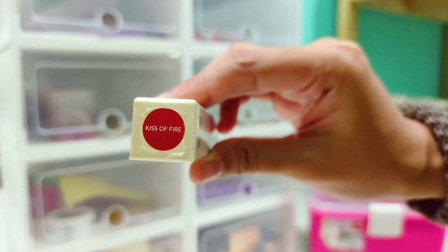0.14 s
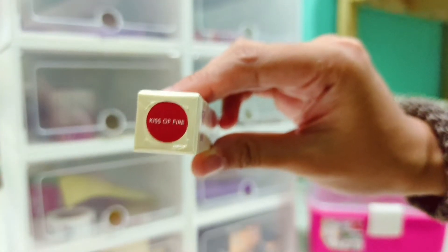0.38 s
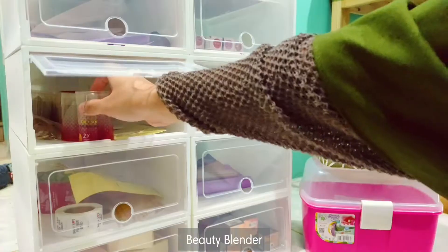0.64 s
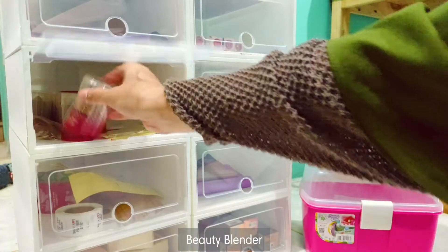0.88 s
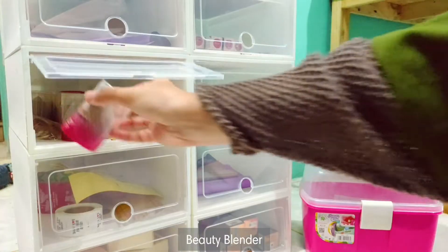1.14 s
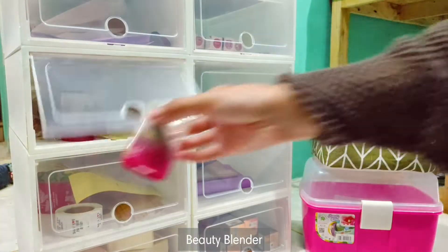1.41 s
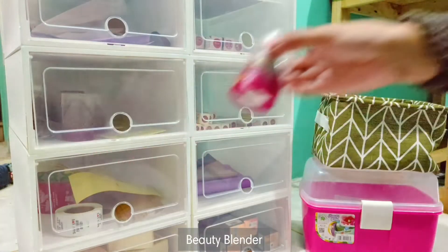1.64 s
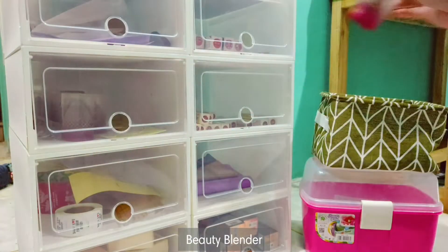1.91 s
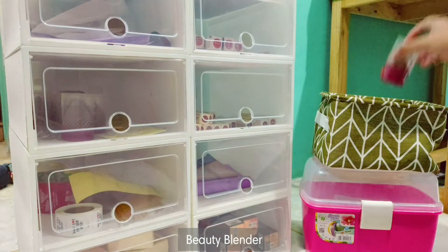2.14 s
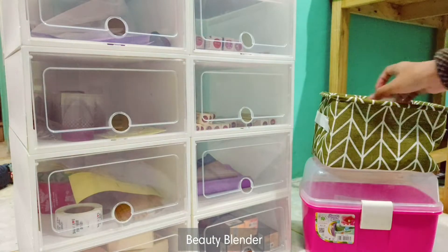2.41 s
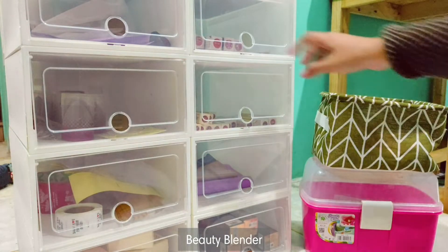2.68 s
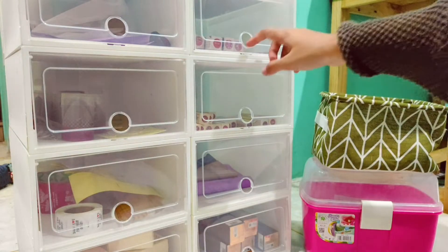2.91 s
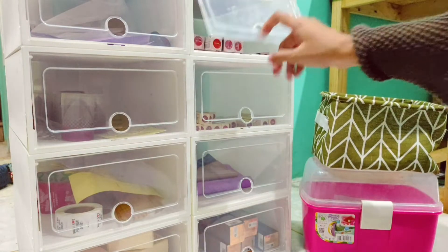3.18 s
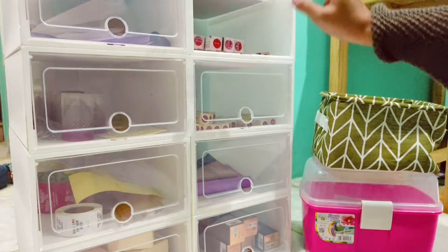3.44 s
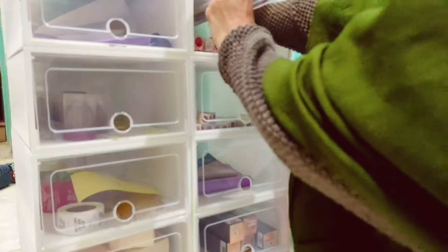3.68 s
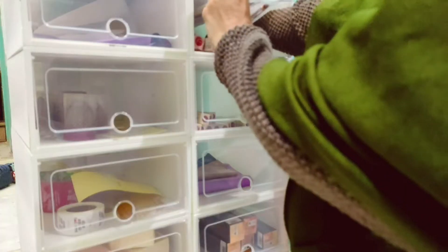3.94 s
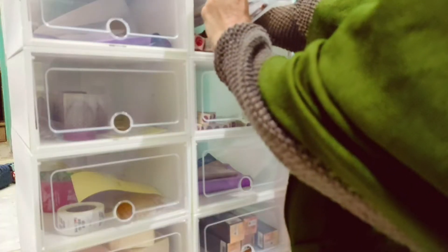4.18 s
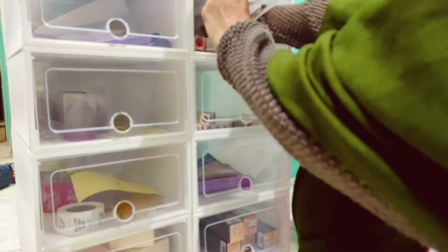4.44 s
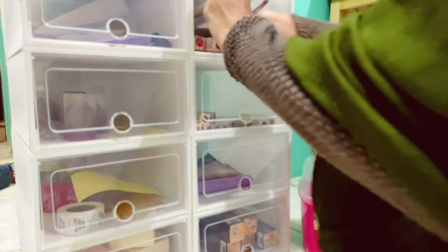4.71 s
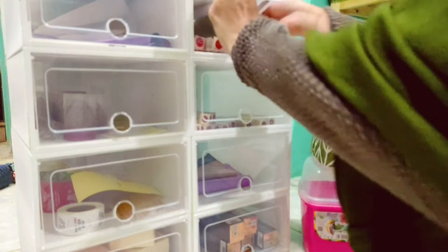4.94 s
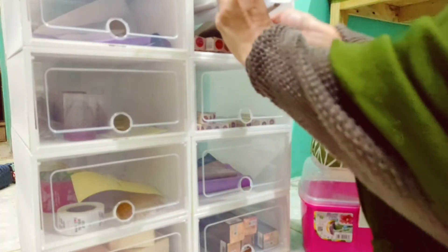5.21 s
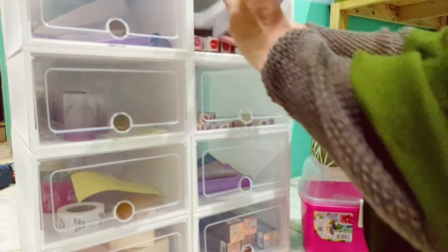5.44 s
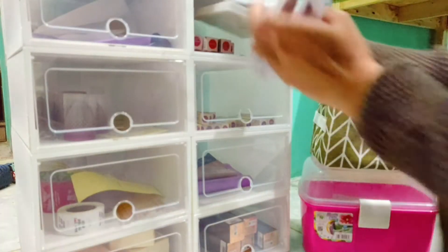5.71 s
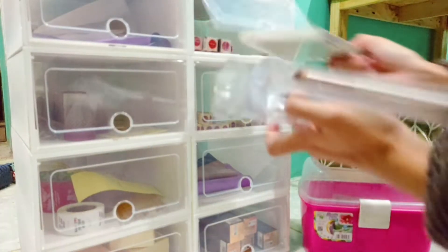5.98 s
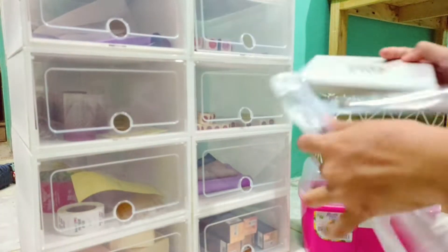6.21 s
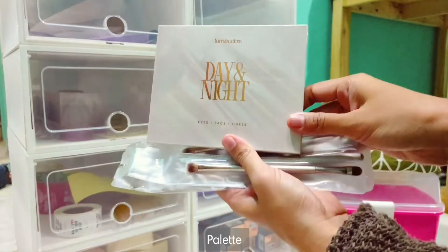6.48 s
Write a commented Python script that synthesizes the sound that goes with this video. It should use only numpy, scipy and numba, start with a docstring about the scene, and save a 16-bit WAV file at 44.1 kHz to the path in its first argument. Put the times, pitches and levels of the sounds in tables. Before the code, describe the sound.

Close stereo pickup of stacked plastic storage boxes indoors, over soft fan-like noise. Quiet ticks come first, then one hard flap clack with a short rattle. A second clack leads to a tight cluster of loud hollow knocks. Packs in crisp film are then dragged out with crackle, rubbing and small bumps, growing busier and finishing with sharp plastic snaps and wrapper rustle.

```python
"""A stack of thin plastic storage boxes in a small hard room, heard at two close microphone ports.
A humming, fan-like floor of coloured noise runs throughout; faint cracks (noise bursts) come first.
From 1.6 s flap doors clack and things are set down and knocked: blows ring the box modes, loose things rattle.
From 3.3 s film-wrapped packs are pulled out: cracks, crinkle and scrape of grainy noise, and the
drumming of the hollow boxes, with further knocks and low thuds to the end."""
import sys
import numpy as np
from scipy import signal
from scipy.fft import rfft, irfft
from scipy.io import wavfile
from scipy.ndimage import uniform_filter1d
from numba import njit

SR = 44100
rng = np.random.default_rng(int(sys.argv[2]) if len(sys.argv) > 2 else 0)


def inscribe(sig):
    """Save sig as 16-bit PCM at rate SR to the path in sys.argv[1].

    A 1-D sig is mono; a 2-D sig holds one channel per row.
    Samples are clipped to [-1, 1] before scaling.
    """
    pcm = np.round(np.clip(np.atleast_2d(sig).T, -1, 1) * 32767)
    wavfile.write(sys.argv[1], SR, pcm.astype(np.int16))


def invert_db(level):
    """Linear amplitude ratio for a level in decibels (20 dB per decade), elementwise."""
    return 10 ** (np.asarray(level, dtype=float) / 20)


N = 291015


def level(x, rms_db):
    """Scale to an rms level."""
    return x * invert_db(rms_db) / np.sqrt(np.mean(x ** 2))


def colour(x, points):
    """Minimum-phase filter through (freq_hz, gain_db) points, built from the folded cepstrum."""
    freq_hz, gain_db = np.transpose(points)
    size = 8192
    bins_hz = np.arange(size // 2 + 1) * SR / size
    log_gain = np.interp(np.log(bins_hz + 1), np.log(freq_hz), gain_db) * np.log(10) / 20
    cepstrum = irfft(log_gain)
    cepstrum[1:size // 2] *= 2
    cepstrum[size // 2 + 1:] = 0
    impulse = irfft(np.exp(rfft(cepstrum)))
    return signal.fftconvolve(x, impulse[None], axes=1)[:, :N]


def ring(x, freq_hz, width_hz):
    """One resonance, gain 1 at its centre."""
    return signal.lfilter(*signal.iirpeak(freq_hz, freq_hz / width_hz, fs=SR), x)


def high_pass(x, order, cutoff_hz):
    """Butterworth high-pass."""
    return signal.sosfilt(signal.butter(order, cutoff_hz, "high", fs=SR, output="sos"), x)


ALIKE_HZ, UNLIKE_BASS = 600, 0.28  # crossover; each port's own share of the bass


def pair():
    """Noise at the two microphone ports: the bass nearly alike, the treble unrelated."""
    shared, left, right = rng.standard_normal((3, N))
    own = np.array([left, right])
    low_pass = signal.butter(1, ALIKE_HZ, fs=SR, output="sos")
    bass = signal.sosfilt(low_pass, shared + UNLIKE_BASS * own)
    return bass + high_pass(own, 1, ALIKE_HZ)


# blows on the boxes: start_s, peak_db (before the high-pass), spot_hz (pitch struck hardest),
# other_db (gain added to every mode), ring_factor (times the mode t60)
BLOWS = [(1.569, -19, 250, -24, 1.2), (2.487, -21, 302, -16, 1.25), (2.507, -34, 205, -23, 0.77),
         (2.547, -39.5, 242, 4, 0.51), (2.67, -39.5, 255, -6, 0.66), (2.709, -38.5, 344, -11, 0.9),
         (2.772, -28.5, 351, -8.5, 0.7), (2.794, -35, 158, -10, 1.1), (2.913, -17.5, 360, -21, 0.89),
         (2.925, -17.5, 219, -28, 0.66), (2.94, -18.5, 558, -26.5, 0.2), (2.961, -26.5, 190, -36, 0.6),
         (3.018, -34, 199, -14, 0.34), (3.078, -36, 342, -6, 1.1), (3.326, -42, 375, 4, 1.4),
         (3.8, -41, 257, 9, 1.5), (4.065, -44, 175, 3, 1.1), (4.145, -45.5, 250, -11, 2.5),
         (4.361, -39, 278, -18, 1), (4.458, -37, 512, -17, 1.5), (4.568, -36, 224, -4, 0.87),
         (4.594, -42, 206, -12, 4.2), (4.908, -40.5, 290, 2, 0.72), (4.939, -43, 250, -22, 2.1),
         (4.981, -32, 196, -1, 0.94), (5.067, -43, 205, -21, 0.44), (5.244, -48, 425, -13, 0.59),
         (5.424, -37.5, 288, -9, 1.2), (5.511, -41.5, 191, -17, .75), (5.668, -34.5, 230, -4.5, 1.2),
         (5.857, -36.5, 188, -15, 1.3), (5.896, -33, 273, -15, 1.3), (5.98, -32.5, 498, -19, 1.5),
         (6.031, -32.5, 256, -16, 1.2), (6.086, -35, 253, -22, 1.7), (6.206, -22.5, 258, -18.5, 1.2),
         (6.324, -46, 250, -13, .8), (6.39, -43.5, 243, -7, 0.87), (6.435, -45.5, 446, -17, 1.3)]
# modes of hollow boxes and flaps: freq_hz, level_db (relative), t60_s; knocks use only freq_hz, level_db and t60_s
BOX_MODES = [(162.3, 1.5, 0.25), (205, 4, 0.12), (237.3, 3.5, 0.092), (250, -8, 0.22), (289.6, 8.5, 0.032),
             (334, 2, 0.056), (374.7, 2.5, 0.043), (425, 3, 0.081), (491, -9.5, 0.17), (604, 2, 0.064),
             (696.4, 3, 0.058), (839, -7, 0.063), (1050, 2.5, 0.036), (1170, -16, 0.17),
             (1307, -13.5, 0.16)]
FALL_DB = 12.5  # fall a quarter octave from the struck pitch
CONTACT_S, SOFTER = 0.003, 0.26  # push time at other_db = 0; lower other_db, softer and longer push
RADIATES_HZ = 146  # thin panels send out little bass below this


def knocks():
    """Each blow rings the box modes, most those near the pitch of the spot it lands on."""
    out, t = np.zeros(N + SR), np.arange(SR // 2) / SR
    freq_hz, level_db, t60_s = np.array(BOX_MODES).T[:, :, None]
    for start_s, peak_db, spot_hz, other_db, ring_factor in BLOWS:
        quarter_octaves = np.log2((freq_hz / spot_hz) ** 4)
        size = invert_db(level_db) * (invert_db(-FALL_DB * quarter_octaves ** 2) + invert_db(other_db))
        push = 1 - np.exp(-(t / (CONTACT_S * invert_db(-SOFTER * other_db))) ** 2)
        decay = 1000. ** (-t / (t60_s * ring_factor))
        blow = push * np.sum(size * np.sin(2 * np.pi * freq_hz * t) * decay, axis=0)
        i = int(start_s * SR)
        out[i:i + len(t)] += invert_db(peak_db) * blow / np.abs(blow).max()
    return high_pass(out[:N], 2, RADIATES_HZ)


# sharp cracks of hard plastic and film: start_s, burst_db (envelope scale), body_db (relative to film part),
# ring_hz (body), t60_s (burst)
CRACKS = [(.6714, -61.5, -12, 1220, 0.052), (.742, -44.5, -19, 1170, 0.037), (0.8725, -57, -14, 1180, 0.14),
          (1.129, -53.5, 2.5, 2500, 0.044), (1.204, -61, -8, 980, 0.09), (1.396, -57.5, -5, 1230, 0.15),
          (1.5608, -44, 4, 1100, 0.1), (1.57, -26.5, -7.5, 1080, 0.068), (1.807, -57.5, 2, 1180, 0.054),
          (2.4838, -43, 8.5, 1105, 0.13), (2.545, -57, 14, 1310, .04), (2.672, -60, 10.5, 1145, .06),
          (2.711, -59.5, 10.5, 1250, 0.042), (2.6392, -48.5, 2.5, 1260, 0.064),
          (2.7704, -47, 5, 1250, .054), (2.9092, -41, 0.5, 1000, 0.16), (2.9317, -32, -2.7, 954, 0.088),
          (3.3243, -45, -1, 1520, .056), (3.356, -54, -3, 966, 0.056), (3.685, -53.5, 2.5, 920, 0.041),
          (3.9554, -36.5, -4, 915, 0.019), (4.002, -48.5, -14, 1240, 0.11), (4.021, -50.5, 3, 2750, 0.084),
          (4.1422, -46.5, -1.5, 1550, 0.095), (4.338, -49.5, 1.5, 1230, 0.085),
          (4.3576, -51.5, 8.5, 890, .11), (4.381, -45.5, -5, 1160, 0.094), (4.4593, -38, 3, 890, 0.033),
          (4.475, -35, -8, 1040, 0.031), (4.5615, -47.5, 4, 1170, 0.2), (4.639, -47, -2, 1230, 0.089),
          (4.7817, -48.5, -5, 920, 0.13), (4.893, -45, -5, 948, 0.089), (4.9724, -40, 3, 1060, 0.021),
          (4.9782, -30.5, -3.5, 914, 0.04), (5.034, -46.5, -2, 915, 0.068), (5.205, -51, -9, 1480, 0.23),
          (5.2442, -41.5, 9.5, 2600, 0.041), (5.422, -48, 10.5, 1210, 0.034),
          (5.4513, -42, -2.2, 940, 0.082), (5.5067, -42, -2.5, 956, 0.11), (5.56, -44.5, -5, 1920, 0.061),
          (5.6538, -32, -17, 4560, 0.13), (5.6725, -51.5, 0.5, 1030, 0.098),
          (5.8074, -38.5, -30, 1320, 0.04), (5.8524, -44, 1.5, 1000, 0.088), (5.884, -33.5, -7, 865, .12),
          (5.9864, -58, .8, 966, .051), (6.0307, -24.5, -5.5, 1050, 0.031), (6.086, -31, -10.5, 1850, 0.06),
          (6.1744, -41.5, 2, 2500, 0.044), (6.1975, -31, 0, 1690, 0.036), (6.206, -27, -6.5, 810, 0.1),
          (6.4342, -39.5, -5, 920, 0.24)]
# spectrum of film: freq_hz, density_db (per Hz, relative)
FILM_SPECTRUM = [(2350, -42), (4000, -9.5), (5880, -9), (7680, -0.5), (9150, -2), (10200, -18.5),
                 (11000, -19), (12400, -30), (14800, -32), (15500, -30)]
# spectrum of body and scrape: freq_hz, density_db (per Hz, relative)
SCRAPE_SPECTRUM = [(300, -16), (600, -0.5), (1200, -4), (2000, -7), (2800, -6.5), (3200, -12), (5500, -15),
                   (8000, -52)]
# place of the cracks: time_s, left_minus_right_db
PLACE = [(0, 0), (2.4, 0.5), (3.4, 1.5), (3.9, -4.5), (5.6, -1.5), (6.6, -2)]


def cracks(rise_s=0.0032, ring_q=13.4, ring_db=-2.5):
    """Short bursts of many tiny buckles: a bright film part and a duller body part with a ring of its own."""
    noise = rng.standard_normal(N + SR) + 2.6 * rng.standard_normal((2, N + SR))
    film = level(colour(noise, FILM_SPECTRUM), 0)
    body = level(colour(noise, SCRAPE_SPECTRUM), 0)
    out, t = np.zeros((2, N + SR)), np.arange(SR // 5) / SR
    for start_s, burst_db, body_db, ring_hz, t60_s in CRACKS:
        i = int(start_s * SR)
        at = slice(i, min(i + len(t), N))
        burst = invert_db(burst_db) * (1 - np.exp(-t / rise_s)) * 1000. ** (-t / t60_s)
        burst = burst[:at.stop - at.start]
        narrowing = np.sqrt(SR * ring_q / ring_hz / np.pi)  # makes up for the narrow band
        struck = level(noise[:, at], ring_db) * burst * narrowing
        rung = ring(struck, ring_hz, ring_hz / ring_q)
        out[:, at] += burst * film[:, at] + invert_db(body_db) * (burst * body[:, at] + rung)
    pan_db = np.interp(np.arange(N) / SR, *np.transpose(PLACE))
    return out[:, :N] * invert_db(np.array([pan_db, -pan_db]) / 2)


def walk(rate_hz):
    """Random levels held 1 / rate_hz s and slewed; spread 1."""
    hold = int(SR / rate_hz)
    steps = np.repeat(rng.standard_normal(N // hold + 1), hold)
    levels = uniform_filter1d(uniform_filter1d(steps, hold), hold)[:N]
    return levels / levels.std()


def grains(rate_hz, spread_db, smear_s):
    """Random little snaps of unequal size, each smeared by a short tail, on a bed of noise."""
    hits = rng.random(N) < rate_hz / SR
    snaps = hits * invert_db(spread_db * np.minimum(rng.exponential(size=N), 3))
    tail = signal.lfilter([1], [1, -np.exp(-1 / (smear_s * SR))], snaps ** 2)
    return pair() * np.sqrt(0.9 + tail / tail.mean())


# hands and sleeve at work among the packs: time_s, crinkle_db, scrape_db
HANDLING = [(.55, -95, -86), (.7, -75, -76), (.84, -73, -79), (1.05, -76, -70.5), (1.22, -67, -75.5),
            (1.425, -62.5, -72), (1.46, -74, -79), (2.38, -91, -77), (2.47, -68, -69.5), (2.52, -104, -89),
            (3.3, -79, -81), (3.5, -69.5, -74), (3.67, -75.5, -71.5), (3.77, -63, -60.5),
            (3.89, -66.5, -60), (3.99, -63, -59.5), (4.15, -70.5, -64.5), (4.4, -67.5, -65.5),
            (4.85, -63.5, -65.5), (5.3, -62, -59.5), (5.41, -52, -52), (5.6, -59, -56.5), (5.7, -58.5, -55),
            (5.89, -63, -62.5), (6.3, -56, -57.5), (6.45, -62, -66.5), (6.6, -69, -54)]
# loose things rattle on after a jolt: start_s, crinkle_db, scrape_db, drum_db, t60_s
RATTLES = [(1.585, -52.5, -53, -50, 0.49), (2.495, -57.5, -53, -51, 1), (2.78, -72, -81, -56, 1),
           (2.939, -44.5, -39.5, -36, 0.46), (4.38, -57.5, -52, -63, 1), (4.576, -56.5, -52, -45.5, 0.3),
           (4.909, -81, -79, -44.5, 0.41), (5.9, -73, -49.5, -37.5, 0.29), (5.95, -65, -58, -45, 0.25),
           (6.038, -44, -48, -51, 0.49)]
RATTLE_RISE_S = 0.0057
DRUM_DB = -2.5  # drumming under the hands relative to the scrape


def handling():
    """Film crinkles, card and cloth scrape, the rubbed boxes drum on their low modes."""
    t = np.arange(N) / SR
    time_s, crinkle_db, scrape_db = np.transpose(HANDLING)
    tracks_db = (crinkle_db, scrape_db, scrape_db + DRUM_DB)
    gain = np.array([invert_db(np.interp(t, time_s, track_db)) for track_db in tracks_db])
    for start_s, *start_db, t60_s in RATTLES:
        since_s = np.maximum(t - start_s, 0)
        swell = 1 - np.exp(-since_s / RATTLE_RISE_S)
        gain += invert_db(np.array(start_db))[:, None] * swell * 1000. ** (-since_s / t60_s)
    film_gain, scrape_gain, drum_gain = uniform_filter1d(gain, SR // 100)
    patchy = walk(25)  # the film moves in fits and starts
    film = colour(grains(120, 4.5, 0.003), FILM_SPECTRUM) * invert_db(2.5 * patchy)
    scrape = colour(grains(90, 4.5, 0.004), SCRAPE_SPECTRUM) * invert_db(1.8 * patchy)
    rub = grains(60, 6.5, 0.0054)
    drum = sum(invert_db(level_db) * ring(rub, freq_hz, 3 / t60_s)
               for freq_hz, level_db, t60_s in BOX_MODES if freq_hz < 650)
    return level(film, 0) * film_gain + level(scrape, 0) * scrape_gain + level(drum, 0) * drum_gain


# shudders of the whole stack: start_s, peak_db
THUDS = [(1.596, -47.5), (3.789, -55), (4.379, -55), (4.598, -50), (4.952, -43.5), (5.871, -40.5)]


def thuds(freq_hz=50, t60_s=0.16, rise_s=0.012):
    """A heavy push rocks the stack: a low sine that swells and dies away."""
    out, t = np.zeros(N + SR), np.arange(SR // 2) / SR
    sway = np.sin(2 * np.pi * freq_hz * t) * (1 - np.exp(-t / rise_s)) * 1000. ** (-t / t60_s)
    for start_s, peak_db in THUDS:
        i = int(start_s * SR)
        out[i:i + len(t)] += invert_db(peak_db) * sway / sway.max()
    return out[:N]


# spectrum of the floor: freq_hz, density_db (per Hz, relative)
FLOOR_SPECTRUM = [(12, -54), (20, -3), (98, -7.5), (144, -11.5), (225, -5.5), (315, -20.5), (382, -10),
                  (597, -17), (667, -19.5), (725, -20.5), (1630, -30.5), (4810, -45), (8880, -35.5),
                  (10200, -47), (15500, -64)]
# narrow humming bands: freq_hz, width_hz (of each of two passes), rms_db
HUM = [(45.7, 8.4, -66), (96.16, 10.4, -61.5), (199, 30, -67.5), (242, 78, -64.5), (375, 6.7, -68),
       (597.7, 23, -73.5), (737.5, 4.3, -74.5)]
FLOOR_RMS_DB = -59


def floor():
    """Air, distant machines and microphone hiss, with narrow bands of hum that waver."""
    hum = sum(level(ring(ring(pair(), freq_hz, width_hz), freq_hz, width_hz), rms_db)
              for freq_hz, width_hz, rms_db in HUM)
    return level(colour(pair(), FLOOR_SPECTRUM), FLOOR_RMS_DB) + hum


@njit
def walls(x, lags, gain, damp):
    """Eight delay lines that feed each other, duller on every round."""
    line, soft, out = np.zeros((8, 4096)), np.zeros(8), np.zeros((2, len(x)))
    for i in range(len(x)):
        total = 0.
        for k in range(8):
            soft[k] += (1 - damp) * (gain[k] * line[k, (i - lags[k]) & 4095] - soft[k])
            total += soft[k]
            out[k % 2, i] += soft[k]
        for k in range(8):
            line[k, i & 4095] = x[i] + soft[k] - total / 4
    return out


ROOM_T60_S, ROOM_DAMP, ROOM_DB = 0.32, 0.015, -13.5  # t60 before damping


def scene():
    """All sources; the room answers the blows, thuds, cracks and handling."""
    near = knocks() + thuds() + cracks() + handling()
    far = near.mean(axis=0)
    for lag in (37, 83, 149):  # all-passes, samples: scattered by shelves
        gap = np.zeros(lag - 1)
        far = signal.lfilter([-0.6, *gap, 1], [1, *gap, -0.6], far)
    lags = np.array([487, 613, 797, 953, 1129, 1361, 1567, 1811])  # samples
    room = walls(far, lags, invert_db(-60 * lags / SR / ROOM_T60_S), ROOM_DAMP)
    return near + invert_db(ROOM_DB) * room + floor()


def band_limit(x):
    """A steep low-pass at the top of the band."""
    return signal.sosfilt(signal.butter(12, 15780, fs=SR, output="sos"), x)


# the left port favours bass and rings near 9 kHz, the right near 7.6 kHz: freq_hz, left_minus_right_db
PORTS = [(60, 8), (200, 10), (380, 12), (700, 8.5), (1290, 7.5), (2400, 3.5), (4400, 0.5), (6200, 1),
         (7500, -7), (8300, 5.5), (9200, 8), (10300, 2), (15000, -0.5)]
LEFT_SHARE = 0.38  # part of the port difference that the left port carries
LEFT_LAG_SAMPLES = 7


def record(dry):
    """Each port has its own colour; the left hears a little later."""
    left_points = [(freq_hz, LEFT_SHARE * diff_db) for freq_hz, diff_db in PORTS]
    right_points = [(freq_hz, (LEFT_SHARE - 1) * diff_db) for freq_hz, diff_db in PORTS]
    left = colour(dry[:1], left_points)[0]
    right = colour(dry[1:], right_points)[0]
    return band_limit(np.array([np.roll(left, LEFT_LAG_SAMPLES), right]))


dry = scene()
out = record(dry)
inscribe(out)
```